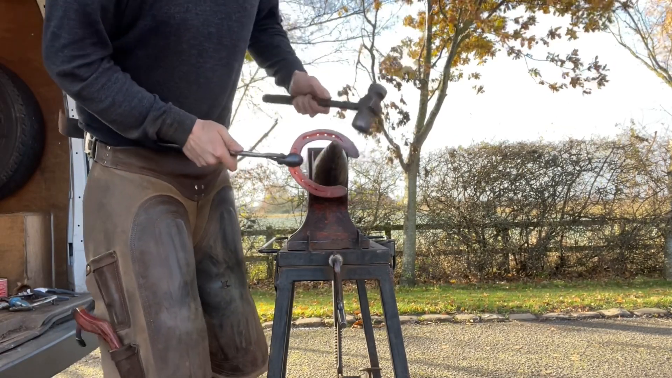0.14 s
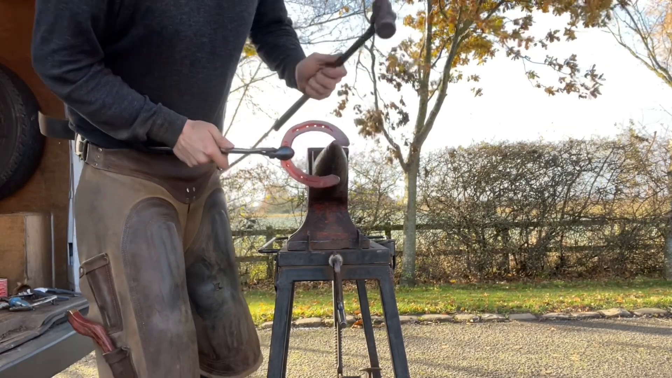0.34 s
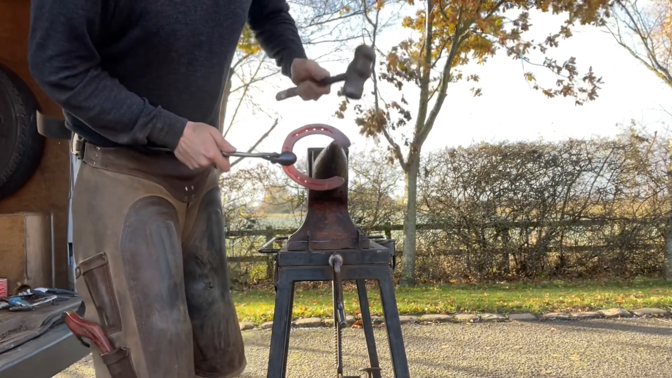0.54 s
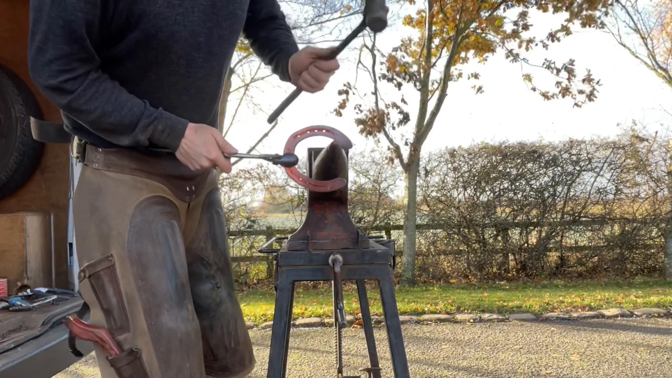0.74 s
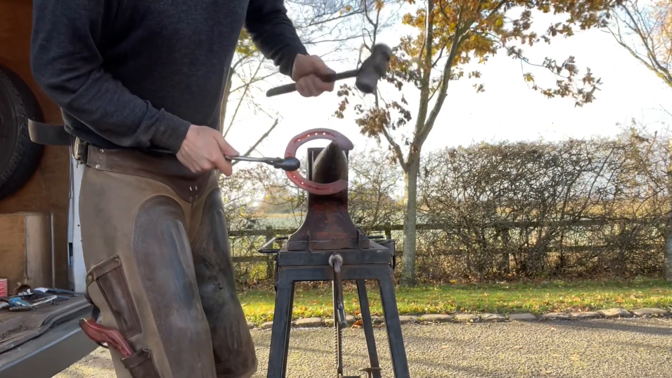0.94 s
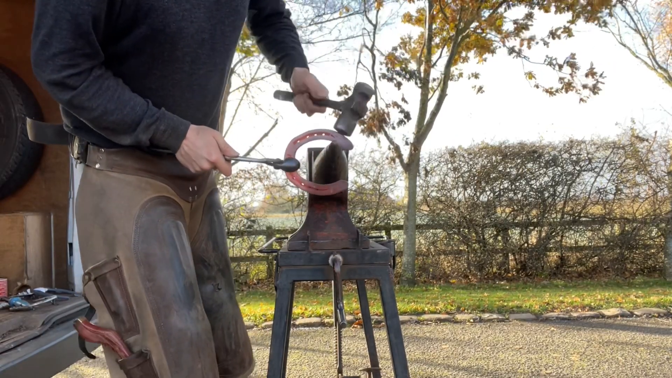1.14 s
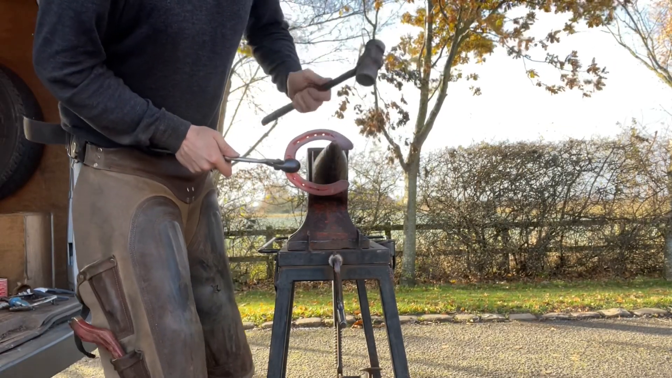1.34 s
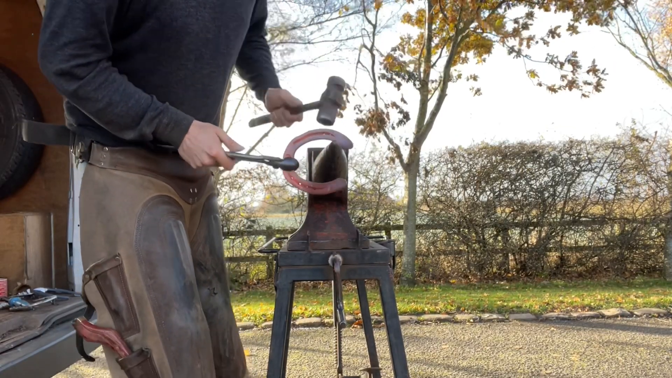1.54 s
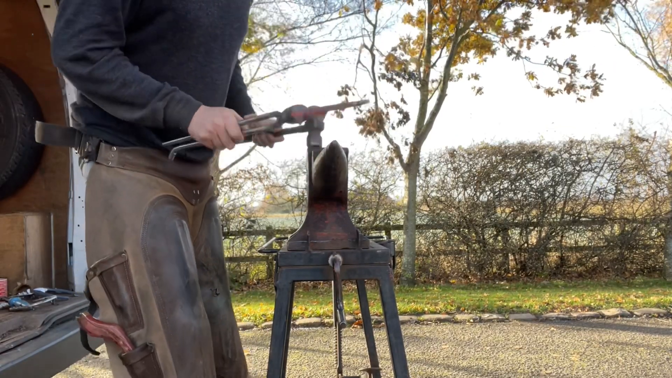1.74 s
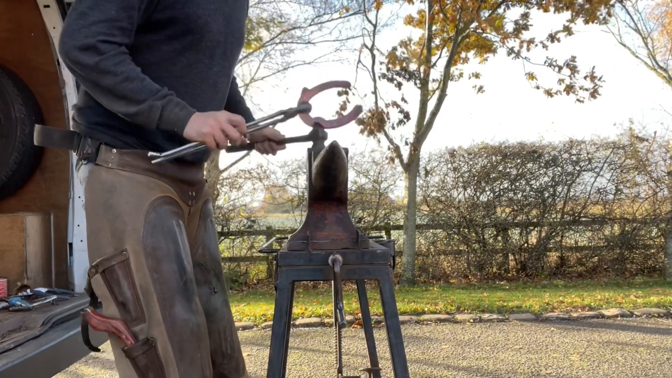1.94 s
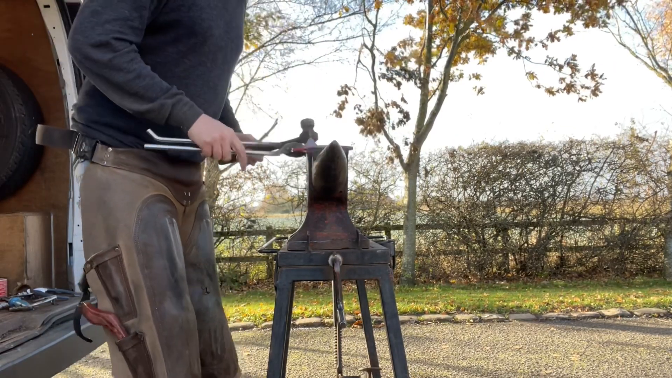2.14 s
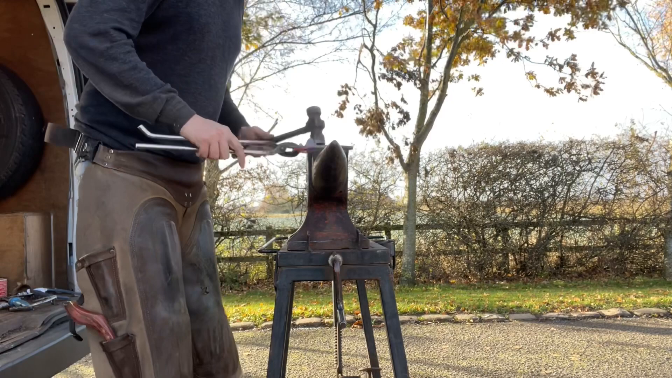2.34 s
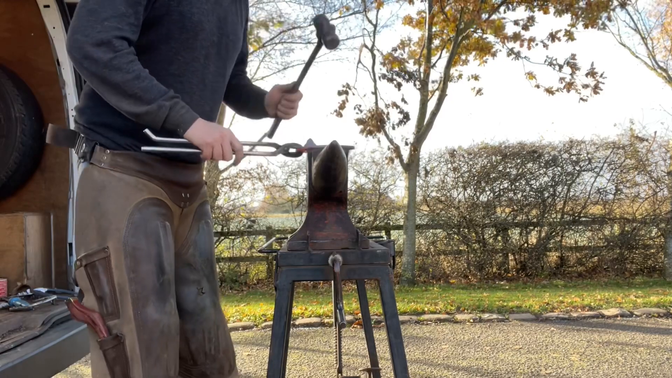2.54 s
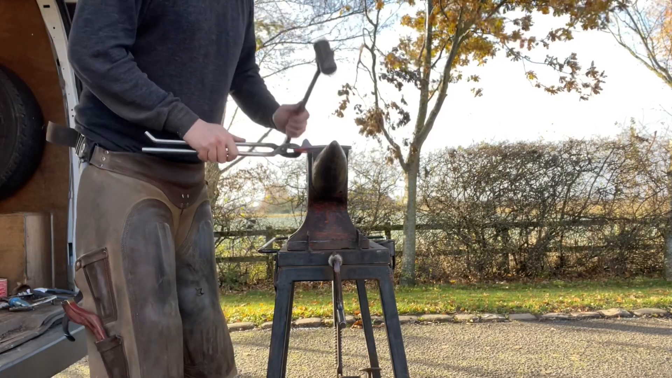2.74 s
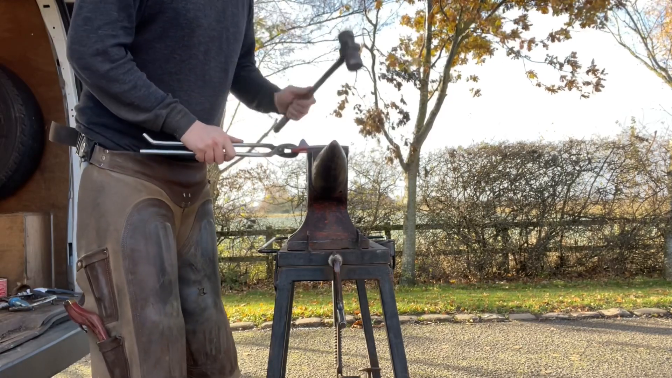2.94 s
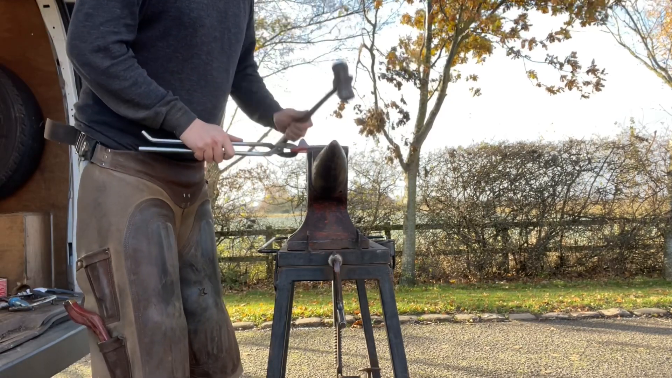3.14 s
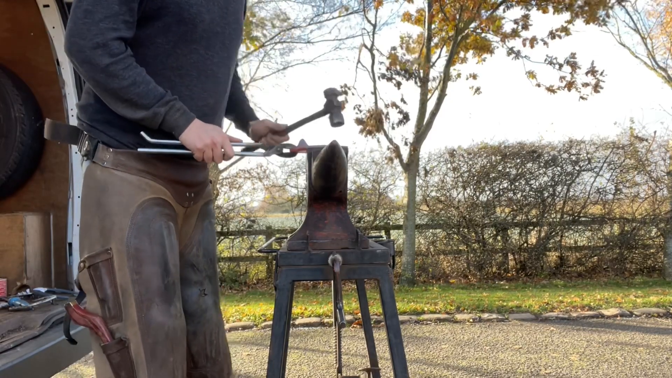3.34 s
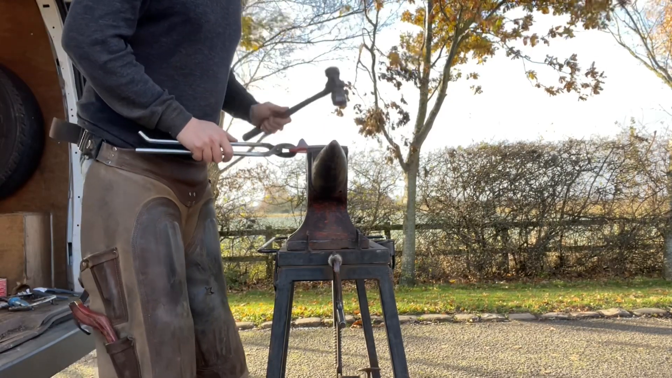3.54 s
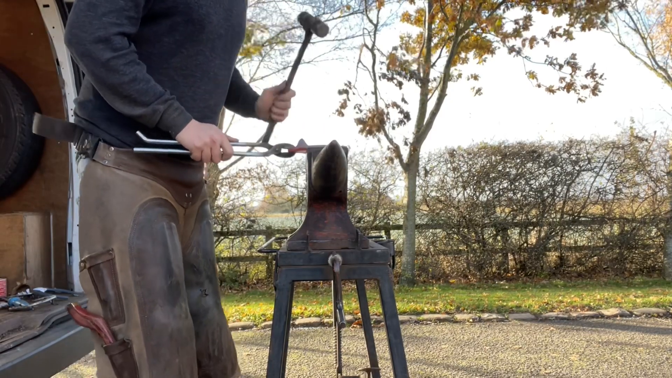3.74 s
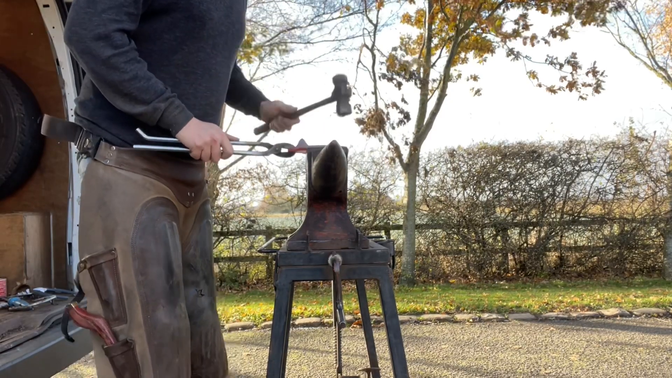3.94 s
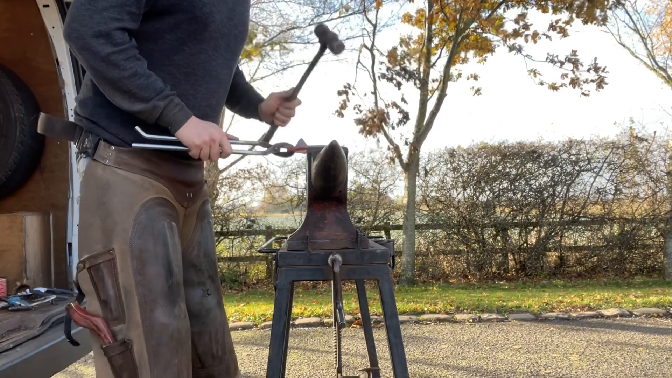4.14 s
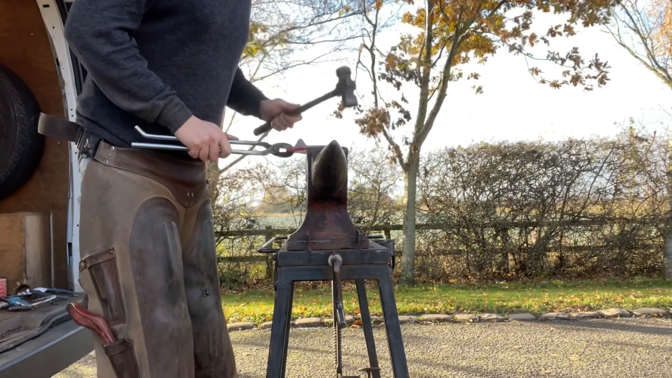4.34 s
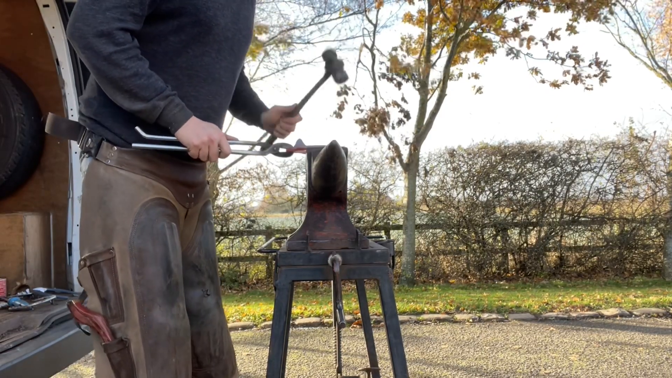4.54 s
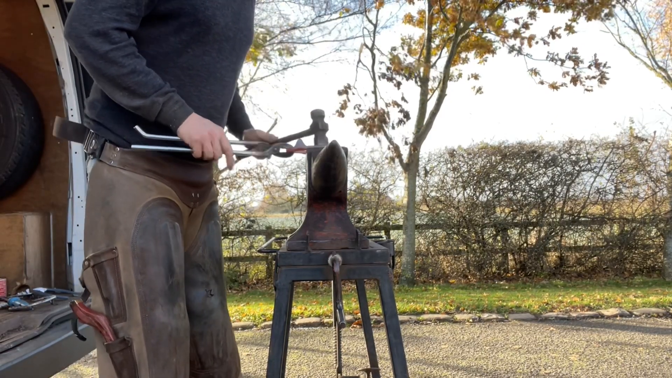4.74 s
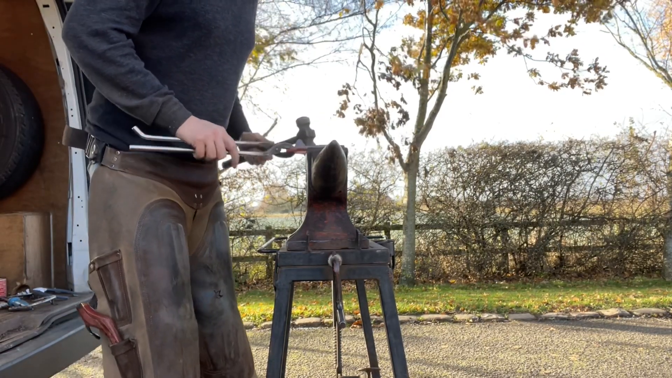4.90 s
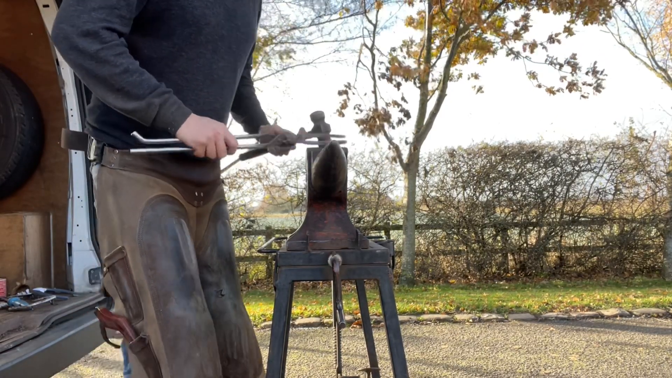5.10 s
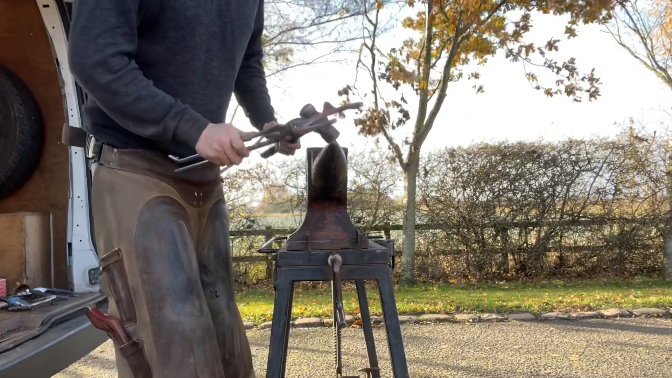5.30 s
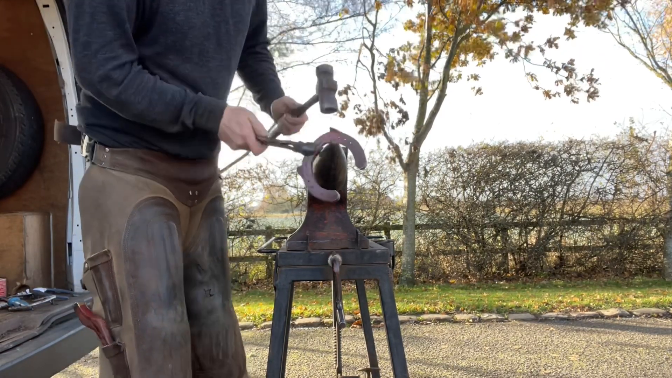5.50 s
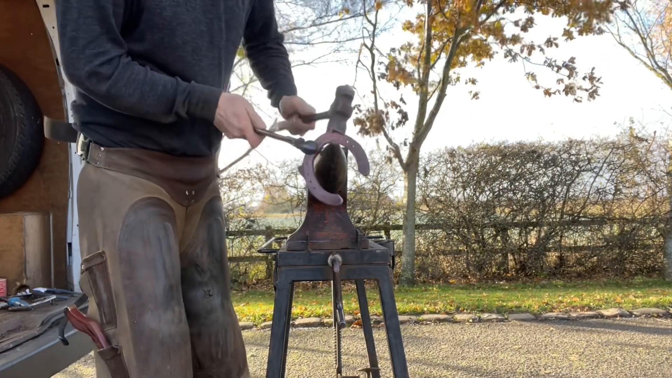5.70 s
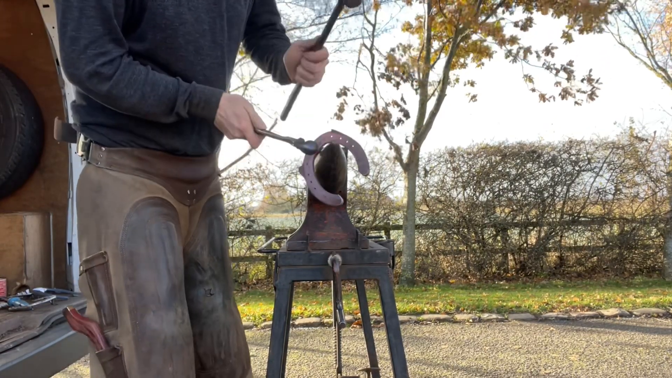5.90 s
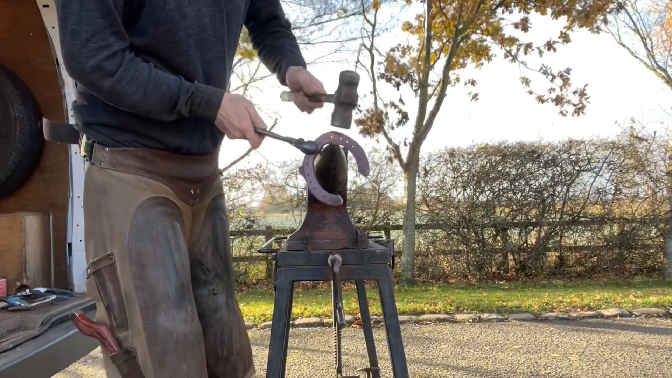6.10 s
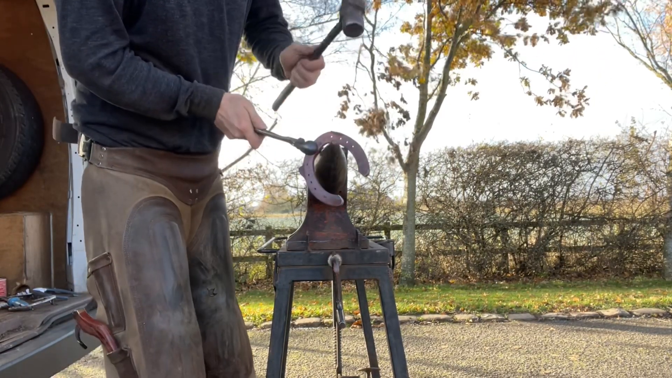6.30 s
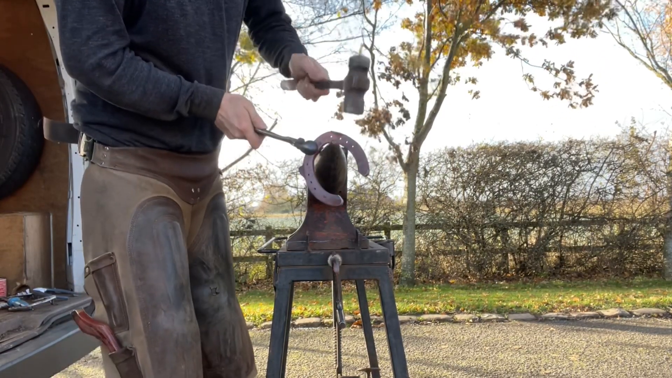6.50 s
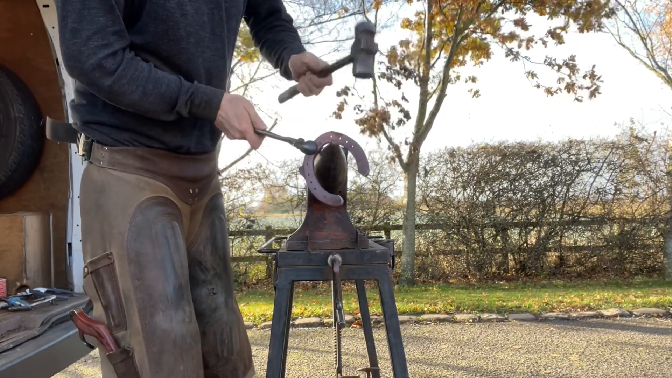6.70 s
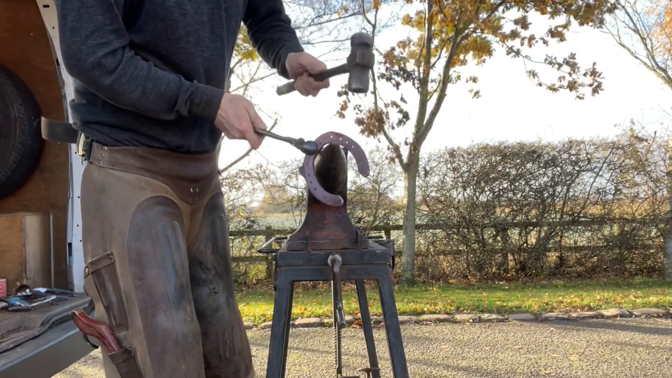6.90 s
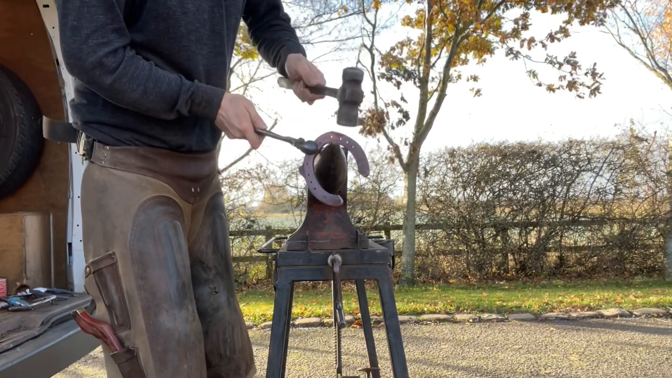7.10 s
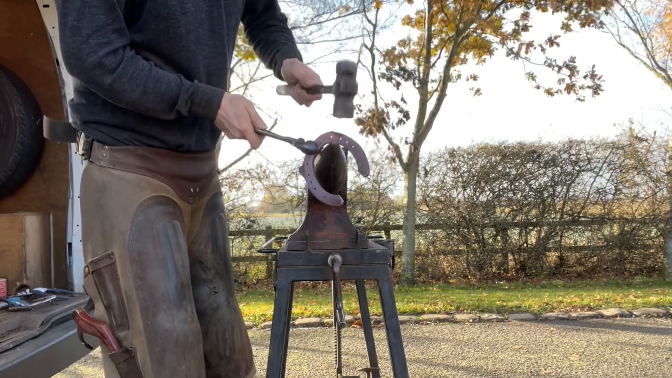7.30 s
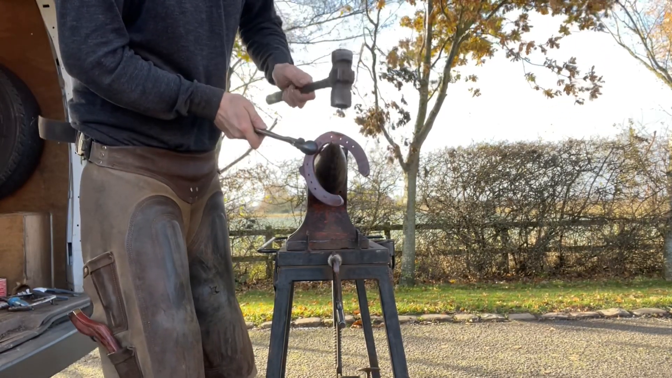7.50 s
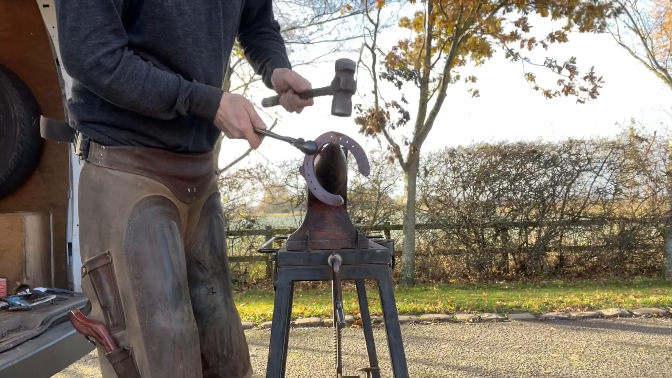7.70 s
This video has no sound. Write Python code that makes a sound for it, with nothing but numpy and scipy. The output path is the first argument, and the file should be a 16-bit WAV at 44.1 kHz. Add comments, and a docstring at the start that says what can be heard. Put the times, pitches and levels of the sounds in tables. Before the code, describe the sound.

Outdoors, close to an anvil, a hammer hits a hot horseshoe. Blows at about 0.1, 0.5, 0.9, 1.2 and 1.4 s are soft to medium clanks with a short midrange ring, the last one strongest. At 1.7 s the hammer drops onto bare steel and bounces in an accelerating, fading patter until 2.05 s, with a gritty scrape and tong clinks, then small ticks to 2.5 s. From 2.8 to 4.6 s six loud, hard blows crack brightly, with high steel tones dying quickly and a brief yard return. Lighter taps tumble at 4.8 to 5.0 s and again at 5.3 to 5.5 s. A hard ringing tap at 5.7 s leads into duller blows about every third of a second, weakening to 7.6 s. Low wind lumps buffet the microphone, especially at 2.1 s and 4.4 to 5.8 s, over a very faint leafy, traffic-like hush.

```python
"""Horseshoe forging on an anvil

A hammer strikes a hot horseshoe on an anvil in a yard and bounces on bare steel between heats of blows.
Each contact is a noise crack with scattered yard return, short shoe modes and dying sines of the steel.
Noise ticks and resonant scrapes come from tongs and shoe; van, paving and hedge return the blows.
Lumpy low noise is wind on the microphone; steady filtered noise is a distant outdoor hush."""
import sys
import numpy as np
from scipy import signal
from scipy.fft import rfft, irfft, next_fast_len
from scipy.io import wavfile
from scipy.ndimage import uniform_filter1d

SR = 44100
rng = np.random.default_rng(int(sys.argv[2]) if len(sys.argv) > 2 else 0)


def master(y):
    """Save y as 16-bit WAV."""
    cut = np.clip(np.atleast_2d(y).T, -1, 1)
    pcm = np.round(cut * 32767)  # scale
    wavfile.write(sys.argv[1], SR, pcm.astype(np.int16))


N = 341775


def amp(db):
    """Decibels to gain."""
    return 10 ** (np.asarray(db) / 20)


def evened(x):
    """Scales to rms 1."""
    return x / np.sqrt(np.mean(x ** 2) + 1e-20)


def read(points, hz):
    """Reads (Hz, value) points on a log-frequency axis."""
    f, value = np.transpose(points)
    return np.interp(np.log(hz + 1), np.log(f + 1), value)


def by_hardness(soft_hard, hard):
    """Interpolates from a soft landing on hot iron (0) to steel on bare steel (1)."""
    soft, stiff = soft_hard
    return soft + (stiff - soft) * hard


def smoothed(x, span):
    """Two running means of span samples."""
    return uniform_filter1d(uniform_filter1d(x, span), span)


def add(mix, s, sound):
    """Mixes a sound in at s seconds, cut at the end of the mix."""
    part = mix[..., round(s * SR):][..., :sound.shape[-1]]
    part += sound[..., :part.shape[-1]]


def noise(length, shape, same, size=128):
    """Two channels of noise with gain shape(t, hz) and left-right likeness same(hz)."""
    t = np.arange(length * 4 // size + 5) * size / 4 / SR
    hz = np.fft.rfftfreq(size, 1 / SR)[:, None]
    a, b, c, d = rng.standard_normal((len(t), len(hz), 4)).T
    like = np.clip(same(hz), -1, 1)
    left = a + 1j * b
    right = like * left + np.sqrt(1 - like ** 2) * (c + 1j * d)
    spectra = np.array([left, right]) * shape(t, hz)
    return signal.istft(spectra, nperseg=size, noverlap=size * 3 // 4)[1][:, :length]


def blow(crack_db, horn_db, waist_db, low_db, high_db, hard, horn_t60_s, free_s):
    """One contact excites noise, short shoe modes and the steel; the yard returns modes and ring."""
    shoe_return_db, steel_return_db = -3.5, -6
    t = np.arange(SR * 2 // 3) / SR
    contact = crack(hard, t)
    clank = shoe_clank(hard, t[:SR // 4])
    steel = steel_ring(crack_db, horn_db, waist_db, low_db, high_db, horn_t60_s, free_s, hard, t)
    echoes = yard_echoes()
    # reflections make the ring flutter
    steel_return = signal.fftconvolve(steel[None], echoes, axes=1)[:, :len(t)]
    steel = steel + amp(steel_return_db) * steel_return
    add(contact, 0, clank)
    add(contact, 0, amp(shoe_return_db) * signal.fftconvolve(clank, echoes, axes=1))
    return amp(crack_db) * contact + steel


def crack_colour(hz, hard):
    """Contact spectrum in relative dB: a harder landing has less thud and more treble."""
    # Each row: frequency in Hz, level in relative dB per Hz.
    crack_spectrum = [(120, -45.5), (200, -12.5), (1450, -8.5), (1770, -4.5), (2170, -1.5), (3430, -9.5),
                      (3760, -10.5), (5840, -13.5), (7540, -22.5), (10100, -26), (16000, -67)]
    thud_db = by_hardness((10.5, -2.5), hard)
    treble_db = by_hardness((-11.5, 0.5), hard)
    tilt = [(900, thud_db), (1800, 0.024), (6000, 0.0046), (8000, treble_db)]
    return read(crack_spectrum, hz) + read(tilt, hz)


def crack(hard, t):
    """Contact noise, a rattle of shoe and stand scattered by the yard, and a decaying low sine."""
    # Shoe and stand resonances. Each row: centre in Hz, width in Hz, peak in dB on the rattle.
    stand = [(278, 20, 11), (597, 47, -13), (806, 79, 5.5), (1460, 94, 22), (2090, 52, -3),
             (2120, 74, -15.5), (4198, 65, 15), (6415, 47, 10.5)]
    # Scattered return. Each row: frequency in Hz, t60 in s.
    yard_t60 = [(300, 0.51), (1000, 0.54), (2500, 0.43), (5000, 0.3), (9000, 0.3), (15000, 0.2)]
    # Yard return on the crack's colour. Each row: frequency in Hz, level in dB.
    yard_colour = [(300, -4.5), (1000, -12.5), (3000, -11.5), (6500, -1), (9000, -7), (15000, 20.5)]
    # Each row: frequency in Hz, left-right likeness from 0 to 1.
    crack_same = [(1000, 0.66), (8000, 0.7), (11000, 1)]
    crack_t60_s, rise_s = .055, 0.0011
    # hedge and fence return a level wash, then it stops
    hedge_end_s, hedge_fade_s, hedge_db = 0.11, 0.026, -20.5  # dB on the rattle
    thump_hz, thump_t60_s = 85, 0.047  # the stand jolts
    rattle_db = by_hardness((-2.5, -14.5), hard)
    thump_db = by_hardness((0.5, -58), hard)

    def shape(u, hz):
        peaks_db = sum(db / (1 + (2 * (hz - f) / width) ** 2) for f, width, db in stand)
        # powers: amp(2 * dB)
        hedge = amp(2 * hedge_db) / (1 + np.exp(np.minimum((u - hedge_end_s) / hedge_fade_s, 50)))
        decay = amp(-120 * u / read(yard_t60, hz))
        scatter = amp(2 * (rattle_db + peaks_db + read(yard_colour, hz))) * (decay + hedge)
        direct = amp(1.96 * peaks_db - 120 * u / crack_t60_s)
        # loose parts sound in passing bands
        drift = uniform_filter1d(rng.standard_normal((len(u), len(hz))).T, size=40, axis=1)
        bumps_db = 1.8 * evened(drift)
        return amp(crack_colour(hz, hard) + bumps_db) * np.sqrt(direct + scatter)

    burst = noise(len(t), shape, lambda hz: read(crack_same, hz), size=256)
    burst = burst * (1 - np.exp(-t / rise_s))
    burst = burst / np.sqrt(2 * np.mean(burst[:, :SR // 70] ** 2))  # unit power over the onset
    thump = amp(thump_db - 60 * t / thump_t60_s) * np.sin(2 * np.pi * thump_hz * t)
    return burst + thump


def steel_ring(crack_db, horn_db, waist_db, low_db, high_db, horn_t60_s, free_s, hard, t):
    """Anvil and hammer parts ring as groups of dying sines, each with its own level and damping."""
    # Mode pitches in Hz, by the part that rings.
    horn_hz = [1960, 2140, 2176, 2200, 2440]
    waist_hz = [4652, 4698]
    low_face_hz = [3682, 3822, 4120, 4250, 4505]
    high_face_hz = [5476, 5655, 6095, 6570, 6810, 8012, 8477, 9050, 11200]
    # Modes of each part. Each row: relative level in dB, ring time as a share of the part's t60.
    horn_modes = [(-8, .6), (-4, .55), (0, 1), (-6, .5), (-10, .35)]
    waist_modes = [(-1.7, 1), (0.15, .25)]
    low_face_modes = [(-7, .7), (-9, .8), (-4, .65), (-10, .6), (0, .9)]
    high_face_modes = [(-6, .6), (0, .7), (-6, .5), (-14, .45), (-14, .5), (-18, .7), (-24, .6), (-26, .6),
                       (-30, .8)]
    base_hz, base_t60_s = [2096, 2128], .8  # a close pair that beats
    base_db = by_hardness((-34.5, -27.5), hard)  # on the crack
    face_t60_s, waist_t60_s, waist_build_s = 0.1, 0.97, .025
    damped_db_per_s = 262.5  # extra loss once the shoe presses on the steel again
    contact_s = 0.0025  # modes build while the head is in contact
    waver_db, waver_s = 2, .015  # arm and tongs move in front of the ring

    steel = ring(horn_hz, horn_modes, horn_db, horn_t60_s, t)
    steel += ring(base_hz, [(1, 1), (-5, 1.0)], crack_db + base_db, base_t60_s, t)
    # the waist takes up the blow late and swells
    waist = ring(waist_hz, waist_modes, waist_db, waist_t60_s, t)
    waist *= 1 - np.exp(-(t / waist_build_s) ** 2)
    steel += waist * amp(-damped_db_per_s * np.maximum(t - free_s, 0))
    steel += ring(low_face_hz, low_face_modes, low_db, face_t60_s, t)
    steel += ring(high_face_hz, high_face_modes, high_db, face_t60_s, t)
    steel *= 1 - np.exp(-t / contact_s)
    waver = evened(smoothed(rng.standard_normal(len(t)), round(waver_s * SR)))
    return steel * amp(waver_db * waver)


def ring(hz, modes, db, t60_s, t):
    """Dying sines set going by the blow; where it lands changes each mode a little."""
    mode_db, share = np.transpose(modes)[..., None]
    t60_s = max(t60_s, .02)
    spread_db = 2 * rng.standard_normal((len(modes), 1))
    u = t[t < 1.2 * share.max() * t60_s]
    level = amp(db + mode_db + spread_db - 60 * u / (share * t60_s))
    tones = level * np.sin(2 * np.pi * np.outer(hz, u))
    return np.pad(tones.sum(0), (0, len(t) - len(u)))


def shoe_clank(hard, t):
    """The shoe changes shape with each blow, so its short modes fall anew, crowding in one band."""
    crowd_db = by_hardness((-3, -14), hard)
    spread = shoe_modes((450, 7000), -10, hard, t, count=36)
    crowd = shoe_modes((1900, 2600), crowd_db, hard, t, count=7)
    return spread + crowd


def shoe_modes(band_hz, db, hard, t, count):
    """Short modes of hot shoe and tongs, scattered in pitch, strength, ring time and side."""
    t60_s, rise_s = 0.092, 0.00069  # t60 is scaled by 0.5 to 1.5 per mode
    max_loss_db = 8
    place, strength, ring_time, side = rng.random((count, 4)).T[..., None]
    hz = band_hz[0] * (band_hz[1] / band_hz[0]) ** place
    mode_db = db + crack_colour(hz, hard) + max_loss_db * (strength - 1)
    level = amp(mode_db - 60 * t / (t60_s * (.5 + ring_time)))
    modes = level * np.sin(2 * np.pi * (hz * t + ring_time)) * (1 - np.exp(-t / rise_s))
    return np.array([(modes * np.cos(side)).sum(0), (modes * np.cos(1 - side)).sum(0)])


def yard_echoes():
    """Yard reflections as decaying half-alike noise, scaled to unit energy on the left."""
    t60_s = .18
    echoes = noise(SR // 4, lambda u, hz: amp(-60 * u / t60_s) + 0 * hz, lambda hz: .5 + 0 * hz)
    return echoes / np.linalg.norm(echoes[0])


def clink(db, hz, decay_s):
    """Tongs or shoe shift on the steel: a noise tick with a broad peak and a little yard tail."""
    tail_gain, tail_s = 0.082, 0.032
    peak = [(hz / 4, -14), (hz, 0), (hz * 1.23, -8), (16000, -30)]  # Hz, dB

    def shape(u, f):
        fade = np.exp(-u / max(decay_s, .002)) + tail_gain * np.exp(-u / tail_s)
        return amp(read(peak, f)) * fade

    tick = noise(SR // 4, shape, lambda f: 0.23 + 0 * f)
    return amp(db) * tick / np.sqrt(np.mean(tick[:, :SR // 200] ** 2))


def scrape(length_s, hz, width_hz, db):
    """Steel slides on steel: friction noise through one resonance, swelling and fading."""
    resonance = lambda u, f: 1 / (1 + (2 * (f - hz) / width_hz) ** 2) + 0 * u
    rub = noise(round(length_s * SR), resonance, lambda f: 0.3 + 0 * f, size=512)
    return amp(db) * evened(rub) * signal.windows.tukey(rub.shape[1], .4)


def ports(x):
    """The two microphone openings hear the anvil with a phase and level difference."""
    # Each row: frequency in Hz, phase by which left leads in radians.
    port_turn = [(300, -.1), (1000, -.3), (2200, -.55), (4500, -1.25), (8000, -2), (10500, -1),
                 (12500, -.2)]
    # Each row: frequency in Hz, left minus right in dB.
    port_tilt = [(300, 3), (640, 3.5), (2000, 4.5), (4500, 4.5), (8000, 0.5), (12000, -0.5)]
    size = next_fast_len(N)
    hz = np.fft.rfftfreq(size, 1 / SR)
    half = np.exp(.5j * read(port_turn, hz)) * amp(read(port_tilt, hz) / 2)
    return irfft(rfft(x, size) * np.array([half, 1 / half]), size)[:, :N]


def wind():
    """Turbulent lumps: low noise whose level wanders within tens of milliseconds, plus gusts."""
    # Breeze between gusts. Each row: time in s, low-band level in dB.
    breeze = [(0, -55.5), (1.1, -57), (1.4, -54.5), (1.9, -47.5), (2.45, -48), (2.72, -49.5), (2.78, -66),
              (2.95, -58), (3.4, -50), (3.52, -59), (3.75, -51), (4.35, -50.5), (4.8, -46.5), (5.65, -60),
              (5.8, -79), (6.15, -54.5), (6.6, -54.5), (7.27, -54.5), (7.45, -52.5), (7.75, -49.5)]
    # Gusts that buffet the microphone. Each row: start in s, length in s, low-band level in dB,
    # high-band level in dB on the low band.
    gusts = [(1.434, 0.074, -43, -36), (1.542, 0.099, -46, -26), (1.627, 0.029, -32, -31),
             (1.72, 0.092, -39.5, -21), (1.831, 0.16, -44.5, -23), (2.088, 0.14, -27.5, -13),
             (2.956, 0.097, -43.5, -2), (3.069, 0.11, -45, -5.5), (3.342, 0.12, -50, -2),
             (4.183, 0.095, -40.5, -8), (4.389, .38, -32, 0), (4.816, 0.036, -42, -8),
             (4.905, .13, -33.5, 1.5), (5.055, 0.031, -47, 11.5), (5.156, .1, -40.5, -2.5),
             (5.41, 0.4, -36.5, -6), (5.585, 0.05, -33.5, 1.5), (6.355, 0.072, -44, 1),
             (6.454, 0.099, -35, -9.5), (6.64, 0.11, -51.5, -10), (7.385, 0.13, -43.5, -10.5)]
    # Band spectra. Each row: frequency in Hz, level in relative dB per Hz.
    low_spectrum = [(12, -58.5), (20, -23.5), (40, -20), (59, 8.5), (91, 5), (129, 4.5), (220, -10.5),
                    (290, -34.5), (480, -120)]
    high_spectrum = [(110, -27), (180, 1), (312, -4.5), (495, -15), (634, -27), (764, -25.5), (1500, -47),
                     (1950, -59), (3300, -120)]
    # Each row: frequency in Hz, left-right likeness from 0 to 1.
    wind_same = [(30, .65), (80, .62), (150, .4), (300, .05)]
    breeze_high_db = -6  # on the low band
    t = np.arange(N) / SR
    same = lambda hz: read(wind_same, hz)
    low_level = amp(np.interp(t, *np.transpose(breeze)))
    high_level = low_level * amp(breeze_high_db)
    for s, length_s, db, high_db in gusts:
        add(low_level, s, gust(length_s, db))
        add(high_level, s, gust(length_s, db + high_db))
    lumps_db = 3 * evened(smoothed(rng.standard_normal(N), 900))
    low = evened(noise(N, lambda u, hz: amp(read(low_spectrum, hz)) + 0 * u, same, size=2048))
    high = evened(noise(N, lambda u, hz: amp(read(high_spectrum, hz)) + 0 * u, same, size=1024))
    return (low * low_level + high * high_level) * evened(amp(lumps_db))


def gust(length_s, db):
    """Pressure of one gust: it swells, sags and lets go over the last tenth."""
    rise, sag_db = 0.21, -11.5  # share of the length; change by the end
    u = np.linspace(0, 1, round(length_s * SR))
    sag = amp(db + sag_db * np.maximum(u - rise, 0) / (1 - rise))
    swell = np.sin(np.pi / 2 * np.minimum(u / rise, 1))
    return sag * swell * np.minimum(10 - 10 * u, 1)


def air():
    """Leaves and distant traffic blur into a steady hush of filtered noise."""
    # Each row: frequency in Hz, level in relative dB per Hz.
    hush_spectrum = [(59, -27.5), (100, 1), (166, -28.5), (298, -2), (395, -0.5), (565, -12), (764, -3),
                     (1180, -15.5), (1850, -14.5), (4480, -24.5), (9000, -40), (11700, -86), (19800, -120)]
    hush_db = -63.5
    shape = lambda u, hz: amp(read(hush_spectrum, hz)) + 0 * u
    return amp(hush_db) * evened(noise(N, shape, lambda hz: 0.067 + 0 * hz, size=1024))


def scene():
    """Blows, clinks and scrapes at the anvil, wind and hush around."""
    # Hammer contacts. Each row: start in s, levels in dB of crack, horn, waist, low face and high face,
    # hardness from 0 to 1, horn t60 in s (at least 0.02 is used), time the waist rings freely in s.
    blows = [(0.07, -29, -24.5, -51, -35, -45, 0.59, 0.15, 0.036),
             (0.473, -30.5, -49, -49, -42, -65, 0.2, 0.25, 0.14),
             (0.86, -29.5, -24.5, -49, -36, -52, 0.16, 0.062, 0.091),
             (1.167, -28.5, -82, -58, -45.5, -55, 0.12, .17, 0.11),
             (1.432, -25, -21.5, -42, -31, -35, 0.29, 0.064, 0.075),
             (1.734, -29, -29.5, -56, -42, -38, 0.46, 0.27, .1),
             (1.828, -31.5, -34.5, -54, -27.5, -25, 0.65, 0.26, .1),
             (1.889, -37.5, -35.5, -66, -34, -35, 0.5, 0.28, .1),
             (1.938, -39, -37, -73, -40, -41, 0.2, 0.089, .1),
             (1.981, -45, -30, -72, -63, -68, .6, .07, .1),
             (2.015, -46.5, -45.5, -70, -65, -68, 0.05, 0.096, .1),
             (2.044, -44.5, -44, -69, -62, -68, .2, 0.44, .1),
             (2.828, -22, -27, -37.5, -24.5, -29.5, 0.73, 0.072, .19),
             (3.205, -20, -28.5, -45, -26.5, -50, 0.72, 0.23, 0.39),
             (3.449, -24, -29, -33, -21.5, -19, 0.98, 0.24, 0.32),
             (3.887, -20, -30.5, -56, -29, -23.5, 0.73, 0.19, 0.53),
             (4.26, -21, -27.5, -55.5, -34.5, -26.5, 0.75, 0.19, 0.51),
             (4.632, -21.5, -29.5, -54, -30, -38, 0.83, .19, 0.11),
             (4.802, -29, -33.5, -38.5, -25.5, -24, 0.82, 0.22, 0.16),
             (4.928, -28, -28, -36.5, -25.5, -27, 0.72, 0.23, 0.19),
             (5.023, -34.5, -39.5, -50, -39, -66, 0.4, 0.25, 0.058),
             (5.299, -28.5, -24.5, -48, -36, -53, 0.59, 0.18, .18),
             (5.392, -37.5, -38.5, -49.5, -44, -66, .2, 0.16, .1),
             (5.471, -42.5, -32.5, -63, -43, -64, 0.1, 0.18, 0.092),
             (5.706, -29.5, -19.5, -58.5, -38.5, -38.5, 1, 0.12, .1),
             (6.115, -28.5, -24.5, -58.5, -42.5, -60, 0.17, 0.053, .1),
             (6.47, -26, -28, -70, -45, -49.5, 0.36, 0.082, .1),
             (6.809, -30, -19, -62, -37, -58, 0.27, 0.027, .1),
             (7.09, -32, -25, -65, -63.5, -64, 0.16, 0.056, .06),
             (7.364, -36, -33, -70.5, -46.5, -45.5, 0.32, 0.072, .06),
             (7.62, -38, -28, -72.5, -64, -60, 0.25, 0.07, .06)]
    # Tongs and shoe shifting. Each row: start in s, level in dB, centre in Hz,
    # decay constant in s (at least 0.002 is used).
    clinks = [(1.664, -56.5, 2490, 0.028), (2.074, -37.5, 4020, 0.032), (2.1014, -35.5, 3000, 0.016),
              (2.199, -55.5, 2140, 0.026), (2.232, -64, 5030, 0.027), (2.333, -57.5, 4850, 0.02),
              (2.358, -61, 2590, 0.0065), (2.5256, -51.5, 5460, 0.01)]
    # Steel sliding on steel. Each row: start in s, length in s, centre in Hz, width in Hz, level in dB.
    scrapes = [(0, 0.07, 1530, 3100, -55), (.12, 0.34, 2140, 350, -68), (1.84, 0.31, 2080, 2520, -54.5),
               (2.2, 0.402, 1790, 250, -68.5), (3.64, 0.1, 1030, 710, -56.5),
               (5.85, 0.059, 407, 100.8, -96)]
    anvil = np.zeros((2, N))
    for table, source in ((blows, blow), (clinks, clink), (scrapes, scrape)):
        for s, *settings in table:
            add(anvil, s, source(*settings))
    return ports(anvil) + wind() + air()


def record(dry):
    """The input stage rounds off peaks near its limit; then a low-pass limits the band."""
    limit, edge_hz = 0.29, 15900
    rounded = limit * np.tanh(dry / limit)
    lowpass = signal.firwin(511, edge_hz, window=("kaiser", 9), fs=SR)
    return signal.oaconvolve(rounded, lowpass[None], "same")


dry = scene()
out = record(dry)
master(out)
```